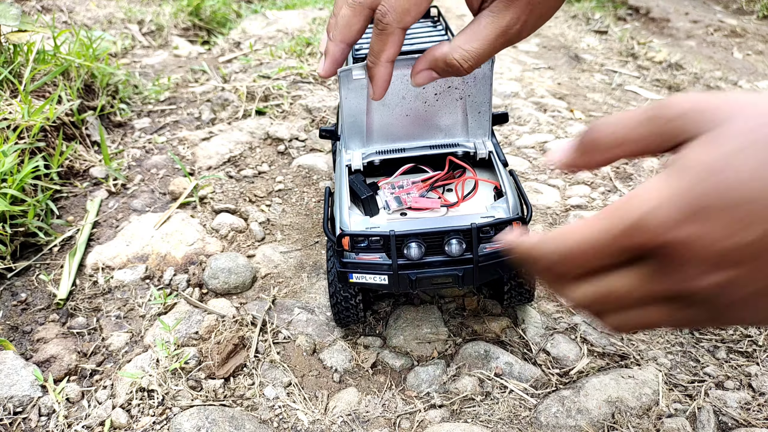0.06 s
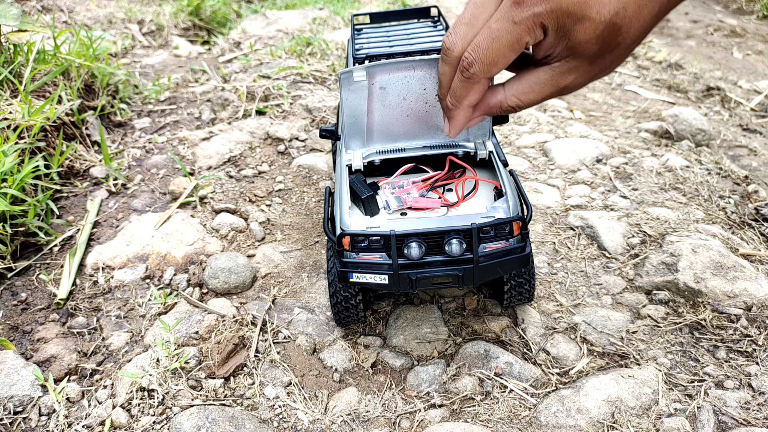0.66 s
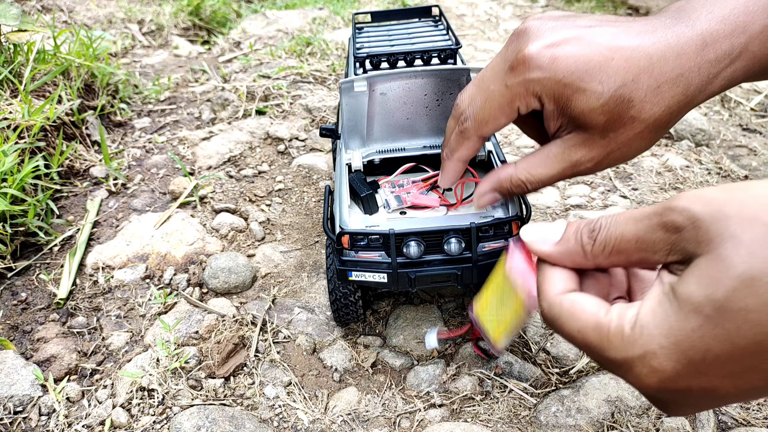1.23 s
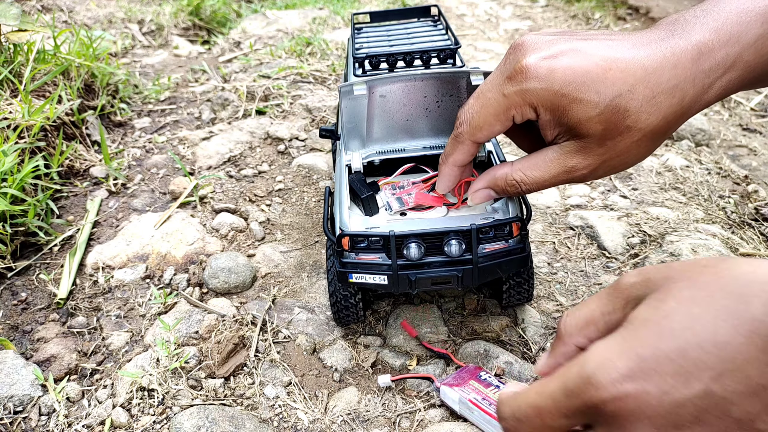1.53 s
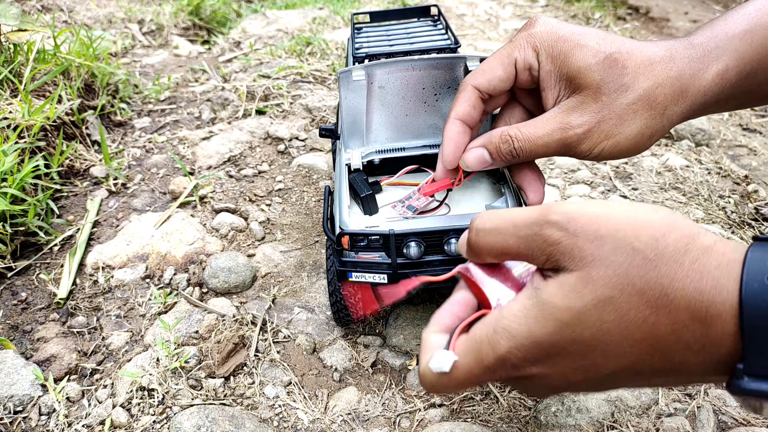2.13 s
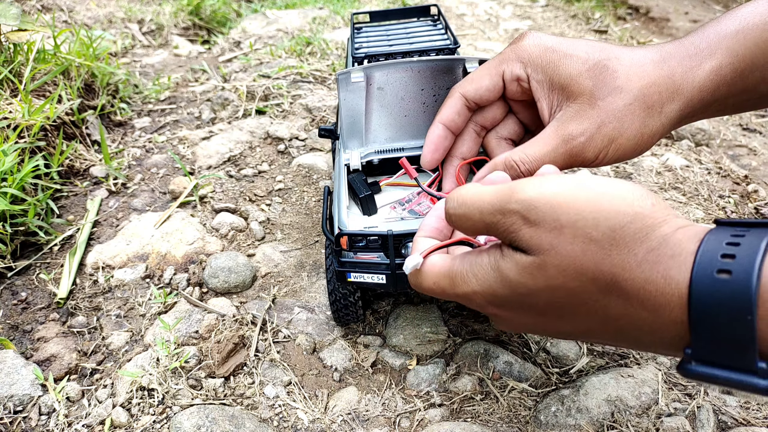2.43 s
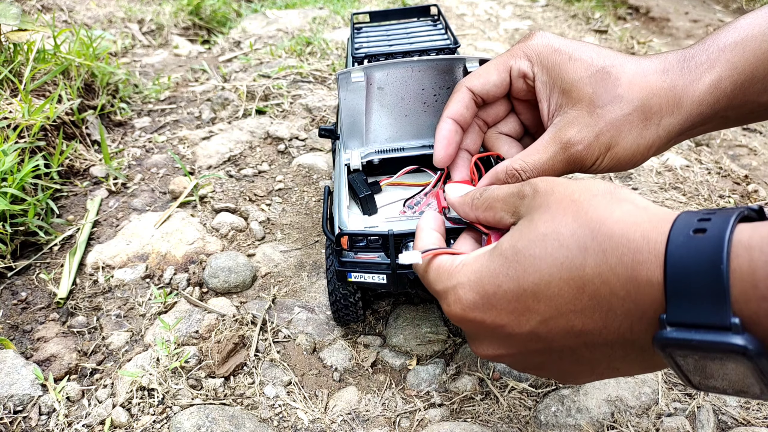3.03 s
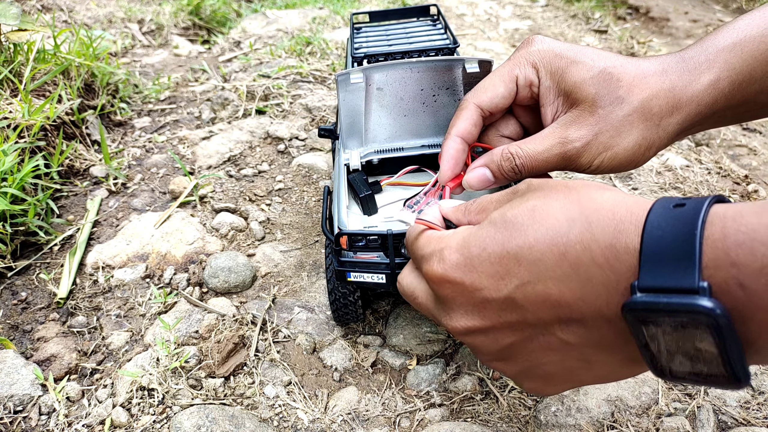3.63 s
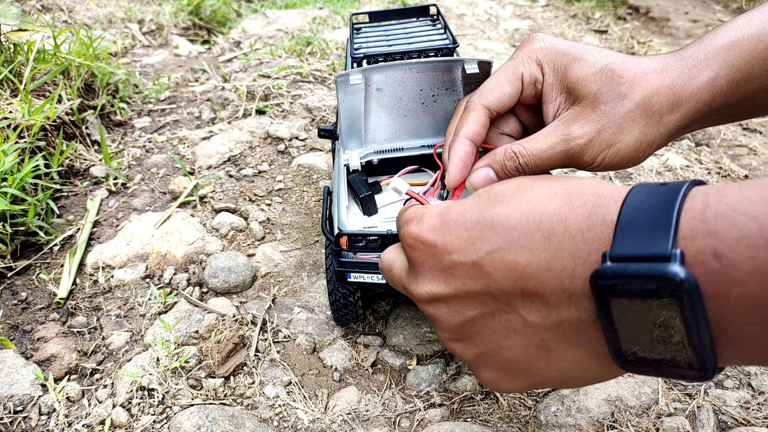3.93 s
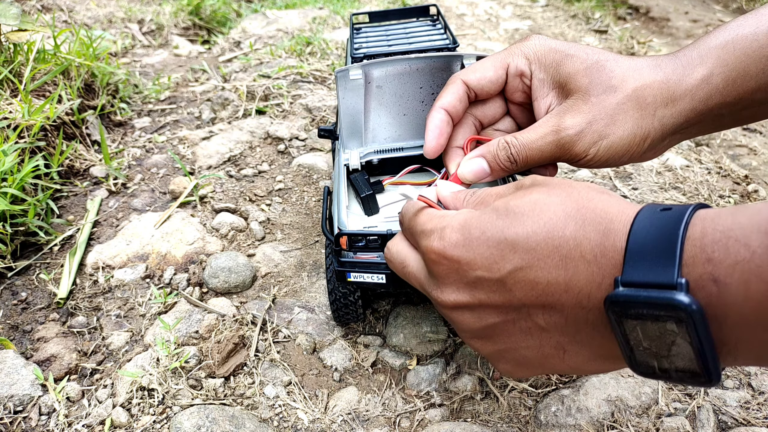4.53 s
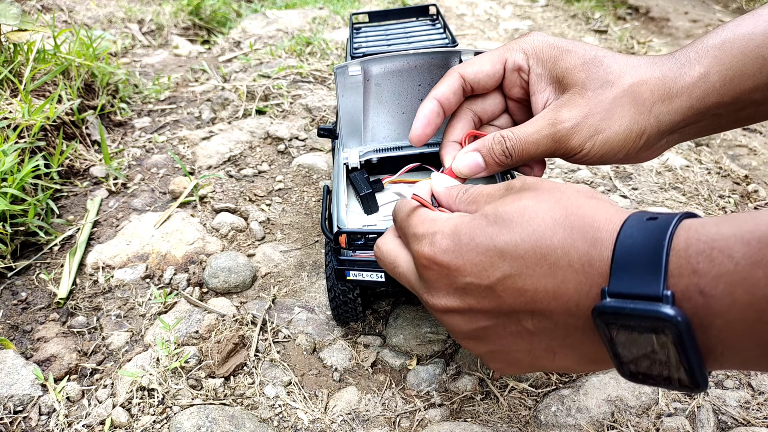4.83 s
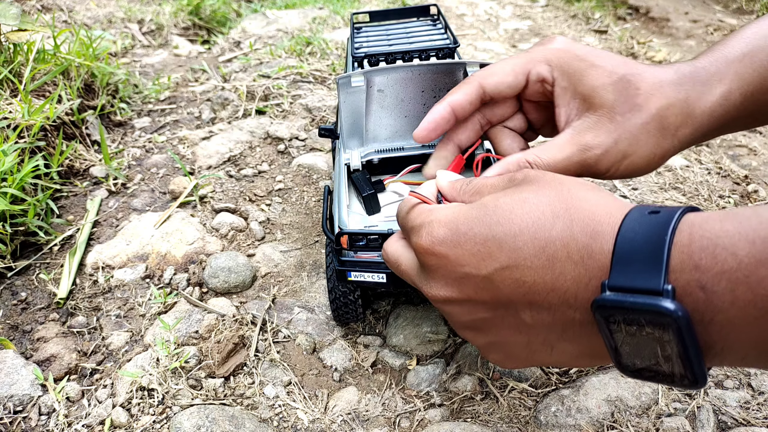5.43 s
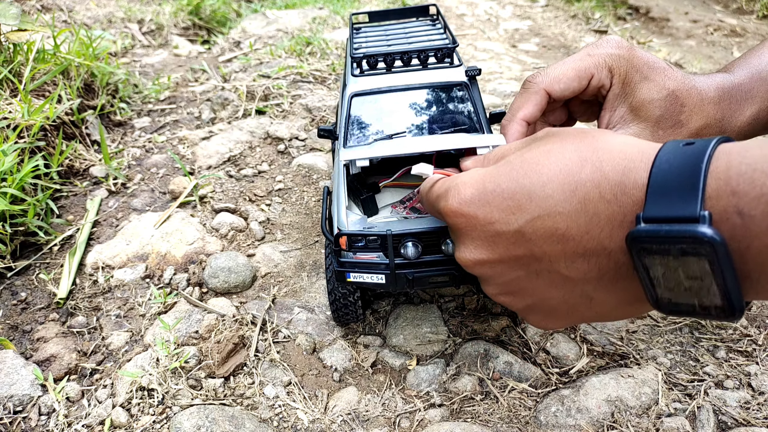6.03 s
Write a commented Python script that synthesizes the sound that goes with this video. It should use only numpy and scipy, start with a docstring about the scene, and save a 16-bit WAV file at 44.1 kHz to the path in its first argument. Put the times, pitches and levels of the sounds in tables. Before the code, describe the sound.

Outdoors on a stony path, hands work on a plastic model truck close to the microphone. A few thin ticks lead to a brief hollow clatter and one loud, hard snap as a battery lands on stone. Scattered small plug clicks follow, then a pause, then faint finger rubbing on plastic. High, pulsing crickets and a quiet rumble with occasional soft low swells continue behind it all.

```python
"""Crickets trill in the grass beside a stony path, over quiet air and a low rumble that now and then booms.
Close to the microphone, hands fit a battery into a plastic model truck. Battery and leads clatter down,
ringing the hollow shell, and snap against a stone; then plugs and bonnet tap and tick, and fingers slide.
Each knock is a quickly damped vibration; each cricket chirp is a wing stroke, a short falling whistle."""
import sys
import numpy as np
from scipy import signal
from scipy.fft import rfft, irfft
from scipy.io import wavfile
from scipy.ndimage import uniform_filter1d

SR = 44100
rng = np.random.default_rng(int(sys.argv[2]) if len(sys.argv) > 2 else 0)


def unload_wav(signal):
    """Save mono or channel-first audio to the path in sys.argv[1] as 16-bit WAV at rate SR, clipped to [-1, 1]."""
    wavfile.write(
        sys.argv[1],
        SR,
        np.round(np.clip(np.atleast_2d(signal).T, -1, 1) * 32767).astype(np.int16),
    )


N = 276066
TIME, FREQS = np.arange(N) / SR, np.fft.rfftfreq(N, 1 / SR)

# Battery and leads knocking on the truck. Each row: start in seconds, level in dB,
# ring time (t60) in seconds, brightness in dB per octave, left over right in dB.
KNOCKS = [(1.3115, -25.5, 0.026, 1, 3.5), (1.3145, -24.5, 0.074, -1.5, -1.5), (1.3245, -24.5, 0.053, 2, -1),
          (1.3395, -28, 0.041, 0, 0), (1.3475, -27, 0.03, 1, -3), (1.3515, -28, 0.031, 3.5, 7),
          (1.361, -30.5, 0.022, 1, -6), (1.392, -42.5, 0.15, -1, -2), (2.036, -40, 0.016, 12, 13),
          (2.0385, -35, 0.015, 6.5, -10.5), (2.0515, -45.5, 0.047, 6, 8)]
# Plugs and fingers on the plastic body, with the same columns as KNOCKS.
BODY_TAPS = [(.004, -43, 0.079, -7.5, 1), (.684, -50, 0.061, 3, -2), (1.871, -52, 0.053, -7, 3),
             (1.951, -47.5, 0.025, -6, -2), (1.977, -50, 0.013, 0, 2), (2.4608, -29, 0.015, 5, 3),
             (2.4635, -30.5, 0.022, -1, 1), (2.4725, -39.5, 0.025, -6, -5), (2.764, -45, 0.067, -0.5, 7),
             (2.7705, -33.5, 0.014, 1, 0)]
# The colour of the struck body. Each row: frequency in Hz, level in dB.
PLASTIC_TONE = [(150, -20), (250, -27.5), (768, -3.5), (1380, -10.5), (1920, -0.5), (2440, -4.5), (2800, 2),
                (3830, -5), (5040, -17), (6210, -31), (6770, -14), (9720, -27), (10600, -48), (12600, -25),
                (15500, -31)]
# The battery meeting the stone: start in seconds, level in dB, left over right in dB.
STONE_HIT = (1.4345, -5.5, 3)


def amp(db):
    """Decibels to gain."""
    return 10 ** (np.asarray(db) / 20)


def unit(x):
    """Scales to rms 1."""
    return x / np.sqrt(np.mean(x ** 2) + 1e-20)


def curve_at(points, hz):
    """Reads a table along a log-frequency axis."""
    f, value = np.transpose(points)
    return np.interp(np.log(hz + 1), np.log(f + 1), value)


def sides(pan_db):
    """Left and right gains; positive leans left."""
    return amp(np.array([[.5], [-.5]]) * pan_db)


def add(mix, s, sound):
    """Adds a stereo sound at s seconds."""
    start = round(s * SR)
    sound, part = sound[:, max(-start, 0):], mix[:, max(start, 0):]
    size = min(sound.shape[1], part.shape[1])
    part[:, :size] += sound[:, :size]


def drift(rate_hz):
    """A smooth random wander of rms 1."""
    return unit(irfft(rfft(rng.standard_normal(N)) * np.exp(-(FREQS / rate_hz) ** 2), N))


def swells(rows, edge_s):
    """Gain for sounds that fade in, hold and fade out."""
    gain = np.zeros(N)
    for s, length, db in rows:
        fade = np.clip(np.minimum(TIME - s, s + length - TIME) / edge_s, 0, 1)
        gain += amp(db) * np.sin(np.pi / 2 * fade) ** 2
    return gain


def stereo_noise(tone, balance_db=0):
    """Coloured noise, alike on both sides of the microphone in the bass only."""
    # Each row: frequency in Hz, correlation of left and right.
    likeness = [(100, .98), (300, 0.84), (600, 0.38), (1200, 0), (2500, 0), (5000, 0.01), (15000, 0.011)]
    left, other = rfft(rng.standard_normal((2, N)))
    same = np.clip(curve_at(likeness, FREQS), -1, 1)
    right = same * left + np.sqrt(1 - same ** 2) * other
    return unit(irfft(np.array([left, right]) * amp(curve_at(tone, FREQS)) * sides(balance_db), N))


def outdoor_air():
    """An uneven low rumble under the faint hiss of distant leaves and insects."""
    # The colours of rumble and hiss. Each row: frequency in Hz, level in dB.
    rumble_tone = [(15, -66), (25, -7), (43, -15.5), (50, -71), (63, -6), (97, 1.5), (167, -3.5),
                   (217, -10.5), (257, -11), (415, -18), (757, -26.5), (1000, -25.5), (1300, -56),
                   (2200, -120)]
    hiss_tone = [(300, -4), (700, 4.5), (1200, 1), (1700, -1.5), (2600, 1), (3700, 0), (4300, -3),
                 (5500, -10.5), (6400, -2.5), (7200, -6), (8200, -1), (11500, -7), (14500, -6.5),
                 (16000, -10.5)]
    # Where the hiss sits. Each row: frequency in Hz, left over right in dB.
    hiss_balance = [(60, 2), (110, 7), (200, 28), (380, 7), (700, 0), (1290, -0.5), (2380, 1), (4400, 3.5),
                    (8120, -4), (15000, 7.5)]
    rumble = amp(-50.5) * stereo_noise(rumble_tone) * amp(1.7 * drift(10))
    swell = amp(.4 * drift(2))
    hiss = amp(-56.5) * stereo_noise(hiss_tone, curve_at(hiss_balance, FREQS)) * swell
    return rumble + hiss


def booms():
    """Low, nearly pure tones that swell and fade softly."""
    # Each row: time of the peak in seconds, pitch in Hz, peak level in dB, half length in seconds.
    pulses = [(1.217, 144, -34.5, 0.013), (1.658, 129.5, -33.5, 0.022), (1.90, 116, -38, 0.024),
              (2.449, 63, -51.5, .09), (2.772, 129.4, -32.5, 0.033), (2.916, 129.5, -42.5, 0.098),
              (3.29, 82, -42.5, 0.16), (3.405, 135.7, -36, 0.031), (3.487, 130.3, -34, 0.042),
              (4.111, 61.6, -42, 0.051), (5.21, 135, -39, 0.048), (5.426, 115.6, -47, 0.065),
              (5.886, 83.4, -44, 0.071)]
    out = np.zeros(N)
    for s, hz, db, half_s in pulses:
        t = TIME - s
        out += amp(db) * np.exp(-abs(t / half_s) ** 1.86) * np.sin(2 * np.pi * (hz * t + rng.random()))
    return out


def insect_band(hz, width_hz, throb_db):
    """Distant insects blur into one narrow, throbbing band of noise."""
    band = np.exp(-((FREQS - hz) / width_hz) ** 2)
    throb = amp(throb_db * np.tanh(drift(24)))
    return unit(irfft(rfft(rng.standard_normal((2, N))) * band, N) * throb)


def distant_insects():
    """A far chorus and whirr, with a thin, very high buzz off to the left."""
    # Each row: start in seconds, length in seconds, level in dB.
    buzz_calls = [(.29, 0.25, -66.5), (1.56, .28, -68)]
    chorus = amp(-65.5) * insect_band(hz=6860, width_hz=70, throb_db=3) * sides(5)
    chorus += amp(-67) * insect_band(hz=7230, width_hz=220, throb_db=3)
    buzz = swells(buzz_calls, edge_s=.09) * insect_band(hz=14400, width_hz=900, throb_db=2) * sides(13)
    whirr = amp(-71.5) * insect_band(hz=3680, width_hz=150, throb_db=3) * amp(drift(1))
    return chorus + buzz + whirr


def wing_stroke(push_s, attack_s, swell_db_per_s, stall_s, release_db_per_s,
                glide_hz_per_s, sag_hz, pan_db, stall_pan_db):
    """The wings push with a slowly falling pitch, then stall at t = 0: the pitch sags, the ring dies."""
    t = np.arange(-push_s, .025, 1 / SR)
    stall = 1 - np.exp(-(np.maximum(t, 0) / stall_s) ** 2)
    attack = np.sin(np.pi / 2 * np.minimum((t + push_s) / attack_s, 1))
    level_db = swell_db_per_s * np.minimum(t, 0) - release_db_per_s * t * stall
    swing = attack * amp(level_db) * signal.windows.tukey(len(t), .1)
    glide_hz = -glide_hz_per_s * t - sag_hz * stall
    side_db = pan_db + (stall_pan_db - pan_db) * (1 + np.tanh(2 * t / stall_s)) / 2
    return t, swing, glide_hz, side_db


def cricket(trills, stroke, pitch_hz, period_s, warmup_db, warmup_hz, overtone, left_lead_rad):
    """Every wing stroke is a falling whistle; a trill starts a little soft and flat."""
    out = np.zeros((2, N))
    t, swing, glide_hz, side_db = stroke
    for first, last, db in trills:
        for k, s in enumerate(np.linspace(first, last, round((last - first) / period_s) + 1)):
            force, detune = rng.standard_normal(2)
            cold = np.exp(-k)
            scrape = unit(uniform_filter1d(rng.standard_normal(4096), size=60))[:len(t)]
            hz = pitch_hz + glide_hz - warmup_hz * cold + 7 * detune + 22 * scrape
            phase = 2 * np.pi * np.cumsum(hz) / SR + np.array([[left_lead_rad], [0]])
            whistle = swing * np.sin(phase) + overtone * swing ** 2 * np.sin(2 * phase)
            add(out, s + t[0], amp(db + .54 * force - warmup_db * cold) * whistle * sides(side_db))
    return out


def scatter(x, t60):
    """Stones and bushes return a thin, short tail."""
    t = np.arange(SR // 2) / SR
    echoes = rng.standard_normal((2, len(t))) * amp(-60 * t / t60)
    return signal.fftconvolve(x.mean(0)[None], echoes / np.linalg.norm(echoes[0]), axes=1)[:, :N]


def crickets():
    """Three crickets in the grass left of the microphone: one near, one higher in pitch, one far."""
    # Each row: first chirp in seconds, last chirp in seconds, relative level in dB.
    near_trills = [(.018, .346, -47.5), (.603, 1.188, -46.5), (1.514, 2.294, -49), (2.555, 3.138, -44),
                   (3.397, 3.853, -43), (3.919, 4.118, -46), (4.378, 5.158, -45.5), (5.419, 5.873, -45),
                   (6.202, 6.267, -50.5)]
    high_trills = [(-.113, .147, -50.5), (.468, 1.184, -50), (1.504, 2.088, -49.5), (2.404, 2.988, -52),
                   (3.245, 3.761, -50), (4.015, 4.534, -48.5), (4.727, 5.052, -48.5), (5.310, 5.764, -48.5),
                   (6.086, 6.281, -49.5)]
    far_trills = [(.35, 1.35, -56), (1.55, 1.99, -54), (2.234, 2.61, -56), (2.905, 3.215, -60),
                  (3.40, 4.31, -56.5), (4.43, 5.11, -55), (5.36, 5.92, -55), (6.04, 6.29, -58)]
    long_push = wing_stroke(push_s=.023, attack_s=.0056, swell_db_per_s=297,
                            stall_s=.0031, release_db_per_s=1000,
                            glide_hz_per_s=2650, sag_hz=72.4, pan_db=18.5, stall_pan_db=13.5)
    short_push = wing_stroke(push_s=.013, attack_s=.013, swell_db_per_s=250,
                             stall_s=.012, release_db_per_s=846,
                             glide_hz_per_s=2400, sag_hz=100, pan_db=11, stall_pan_db=8.5)
    near = cricket(near_trills, long_push, pitch_hz=6822, period_s=.065,
                   warmup_db=1, warmup_hz=5, overtone=.15, left_lead_rad=2.3)
    high = cricket(high_trills, short_push, pitch_hz=7600, period_s=.065,
                   warmup_db=5, warmup_hz=110, overtone=0, left_lead_rad=-1.1)
    far = cricket(far_trills, short_push, pitch_hz=7290, period_s=.062,
                  warmup_db=1, warmup_hz=5, overtone=0, left_lead_rad=-.2)
    voices = amp(-1.9) * near + amp(-1.5) * high + amp(-2.5) * far * sides(-5)
    return voices + amp(-10) * scatter(voices, t60=.13)


def blows(rows, tone, rise_s, damping_slope, width):
    """Each blow is a burst of dense, quickly damped vibration; the low octaves ring longest."""
    out, t = np.zeros((2, N)), np.arange(8192) / SR
    hz = np.fft.rfftfreq(len(t), 1 / SR)
    octave, centres = np.log2((hz + 20) / 2000), np.arange(-4, 4)
    bands = np.array([np.interp(octave, centres, row) for row in np.eye(len(centres))])
    delay = np.exp(-2j * np.pi * hz * np.array([[4], [0]]) / SR)  # the truck stands a little to the right
    spread = width * np.sqrt(hz / hz[-1]) * np.array([[1], [-1]])
    for s, db, t60, bright_db, pan_db in rows:
        shared, other = np.exp(2j * np.pi * rng.random((2, len(hz))))
        colour = amp(curve_at(tone, hz) + bright_db * np.clip(octave, -3, 2))
        spectrum = (shared * delay + spread * other) * colour
        band_t60 = t60 * 2. ** (-damping_slope * centres[:, None])
        ringing = irfft(spectrum[:, None] * bands) * amp(-60 * t / band_t60)
        burst = unit(ringing.sum(1) * (1 - np.exp(-t / rise_s)))
        burst *= np.sqrt(t60 / 10 / t[-1])  # the level counts the energy over a tenth of the ring time
        add(out, s, burst * amp(db) * sides(pan_db))
    return out


def contacts(rows, tick_db, share, t60):
    """Rows for the thin tick that starts each blow; its level follows a share of the blow's."""
    return [(s, tick_db + share * db, t60, 0, pan_db / 2) for s, db, *_, pan_db in rows]


def finger_rub():
    """Fingers slide grainily over plastic, above the faint steady rustle of hands at work."""
    # Each row: start in seconds, length in seconds, level in dB.
    slides = [(-.08, .24, -86), (5.38, 0.19, -62), (5.51, 0.19, -58.5), (5.82, 0.4, -61.5)]
    # Each row: frequency in Hz, level in dB.
    rub_tone = [(150, -2), (400, 1), (850, 0), (1400, -10.5), (2100, -5), (3300, -10), (5000, -11),
                (15000, -24)]
    friction = unit(stereo_noise(rub_tone) * amp(2.4 * drift(56)))
    return (amp(-61.5) + swells(slides, edge_s=.054)) * friction


def finger_slips():
    """Fingertips catch and slip on the bonnet."""
    # Same columns as KNOCKS.
    slips = [(5.508, -48.5, 0.11, 3.5, 0), (5.558, -44, 0.033, 12, 10), (5.574, -46, .04, 7, 10),
             (5.581, -47, 0.046, -1, -4), (5.599, -48.5, 0.13, 0, -1), (5.617, -44.5, 0.057, 13.5, 5),
             (6.0, -41.5, 0.053, -9.5, -1), (6.104, -47.5, 0.043, -7.5, -1)]
    # Each row: frequency in Hz, level in dB.
    slip_tone = [(150, -17), (450, -3), (850, 3), (1400, -2), (2200, -8), (3400, -4), (4300, -17),
                 (5400, -36), (15000, -43)]
    return blows(slips, slip_tone, rise_s=.00074, damping_slope=.39, width=.45)


def ticks():
    """Fingernails and wires tick thinly, as does the first touch of each knock, snap and tap."""
    # Same columns as KNOCKS.
    nails_and_wires = [(.641, -45, .015, 2, 6), (.7655, -42, .018, 2, 6), (.772, -44.5, .02, 2, 5),
                       (.8145, -41, .016, -1.5, 2), (.8755, -54, .015, -3, 2), (1.3865, -45.5, .04, -1, 0),
                       (1.422, -50, .03, -1, 0), (1.5265, -50, .04, 0, 2)]
    # Each row: frequency in Hz, level in dB.
    tick_tone = [(500, -22), (2000, -6), (3500, -2), (5300, -10), (8000, -1), (12000, -2), (15000, 0)]
    touches = (contacts(KNOCKS, tick_db=-37, share=.2, t60=.015)
               + contacts([STONE_HIT], tick_db=-26.5, share=.2, t60=.012)
               + contacts(BODY_TAPS, tick_db=-16, share=1, t60=.012))
    return blows(nails_and_wires + touches, tick_tone, rise_s=.00034, damping_slope=.1, width=.45)


def plug_taps():
    """Plugs and fingers strike the plastic body lightly."""
    return blows(BODY_TAPS, PLASTIC_TONE, rise_s=.0016, damping_slope=.3, width=.2)


def shell_ring(rows):
    """Knocks ring the truck's hollow shell; brighter ones favour its high modes."""
    # Each row: frequency in Hz, relative level in dB, ring time (t60) in seconds.
    modes = [(328, -2, 0.09), (485, -3.5, 0.097), (1048, -33, 0.053), (1417, -21, 0.12),
             (1570, 3.5, 0.0058), (1878, -8.5, 0.06), (2104, -10.5, 0.047), (3070, -19, 0.031)]
    out, t = np.zeros((2, N)), np.arange(4096) / SR
    hz, level, t60 = np.transpose(modes)[:, :, None]
    onset = 1 - np.exp(-t / .0005)
    for s, db, _, bright_db, pan_db in rows:
        phase = 2 * np.pi * rng.random(hz.shape)
        decay = amp(level + bright_db * np.log2(hz / 1000) - 60 * t / t60)
        ring = (decay * np.sin(2 * np.pi * hz * t + phase)).sum(0)
        add(out, s, ring * onset * amp(db) * sides(pan_db))
    return out


def battery_clatter():
    """Battery and leads tumble against the truck and set its shell ringing."""
    # Each row: frequency in Hz, level in dB.
    knock_tone = [(100, -31), (220, 1.5), (330, -4.5), (500, -1), (750, -9), (1250, -13), (1900, -15.5),
                  (2600, -17), (3200, -7), (4000, -19.5), (5300, -25), (8400, -27.5), (10500, -50),
                  (15500, -51)]
    knocks = blows(KNOCKS, knock_tone, rise_s=.00062, damping_slope=.22, width=.5)
    return knocks + amp(-3) * shell_ring(KNOCKS)


def battery_snap():
    """One hard contact with stone, close to the microphone, rings short modes over a plastic crack."""
    # Each row: frequency in Hz, relative level in dB, ring time (t60) in seconds.
    modes = [(465, -13, .018), (700, -17, .012), (982, -16, .012), (1975, -12, .008), (2695, -6, .008),
             (3208, 2, .006), (3760, -9, .006), (4660, -14, .005), (6690, -16, .005), (7905, -19, .005),
             (9220, -18, .004), (12200, -23, .003), (15100, -25, .004)]
    s, db, pan_db = STONE_HIT
    out, t = np.zeros((2, N)), np.arange(2048) / SR
    phases = rng.uniform(-.45, .45, (len(modes), 2, 1))  # slightly different on each side
    lag_s = np.array([[1.5], [0]]) / SR  # the microphone's right port is nearer
    ring = sum(amp(level - 60 * t / t60) * np.sin(2 * np.pi * hz * (t - lag_s) + phase)
               for (hz, level, t60), phase in zip(modes, phases))
    onset = 1 - np.exp(-(t / .00022) ** 2)
    add(out, s, -ring * onset * amp(db) * sides(pan_db))
    crack = contacts([STONE_HIT], tick_db=-22.5, share=.2, t60=.015)
    return out + blows(crack, PLASTIC_TONE, rise_s=.00034, damping_slope=.14, width=.4)


def scene():
    """The truck close in front, insects and open air around it."""
    background = outdoor_air() + booms() + distant_insects() + crickets()
    hands = finger_rub() + finger_slips() + ticks() + plug_taps()
    return background + hands + battery_clatter() + battery_snap()


def record(dry):
    """The microphone's bass roll-off, soft overload on the loudest peak, and the band limit."""
    low_cut_hz, ceiling, top_hz = 50, .6, 15750
    lean = signal.sosfilt(signal.butter(3, low_cut_hz, "highpass", fs=SR, output="sos"), dry)
    rounded = ceiling * np.tanh(lean / ceiling)
    lowpass = signal.firwin(511, top_hz, window=("kaiser", 9), fs=SR)
    return signal.oaconvolve(rounded, lowpass[None], "same")


dry = scene()
out = record(dry)
unload_wav(out)
```